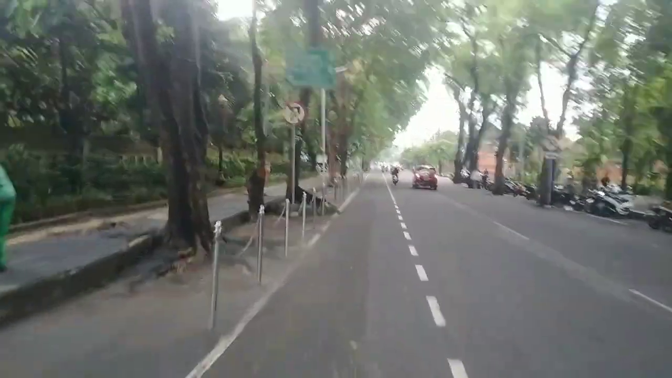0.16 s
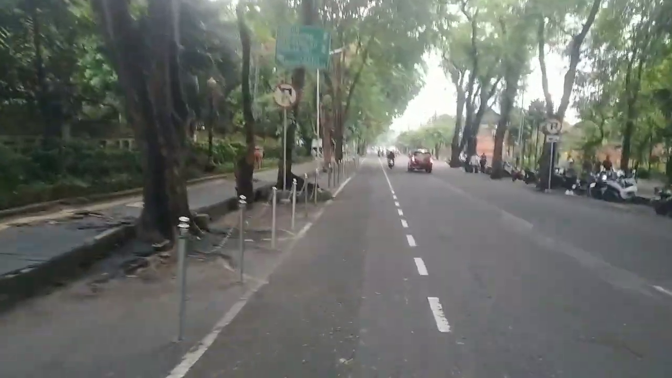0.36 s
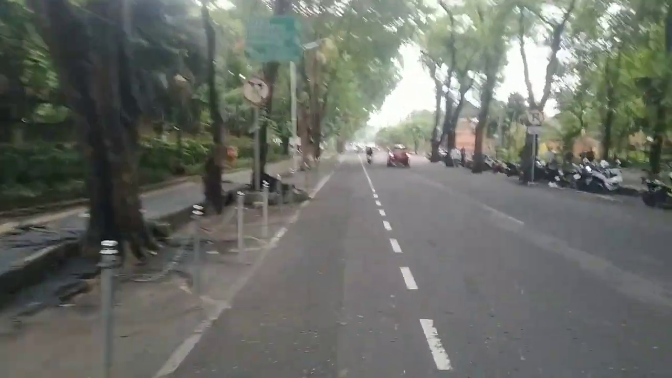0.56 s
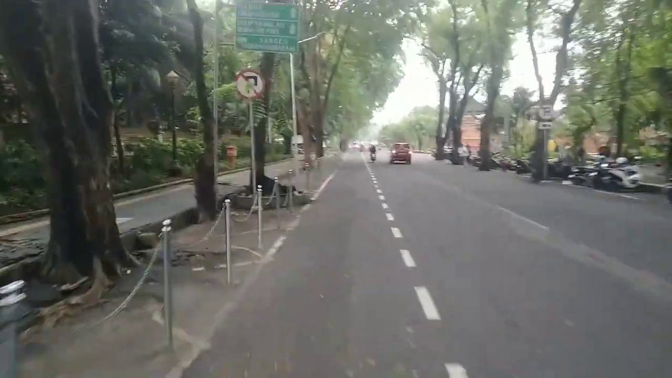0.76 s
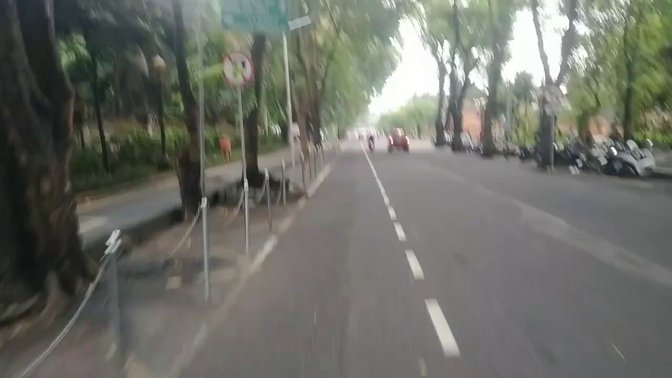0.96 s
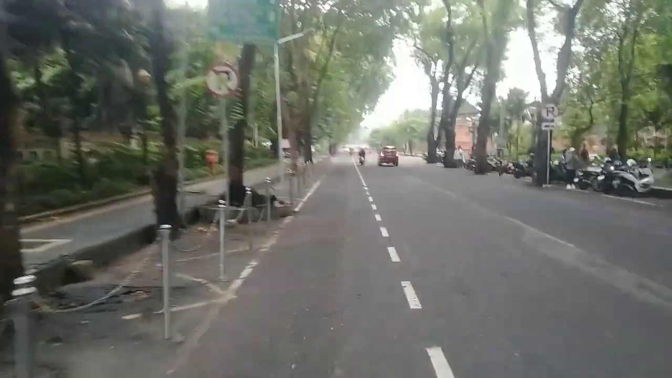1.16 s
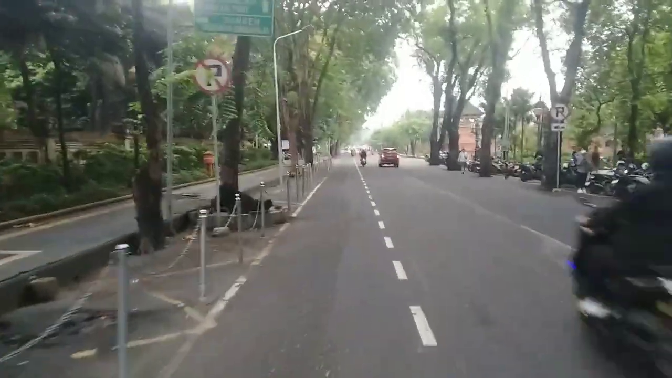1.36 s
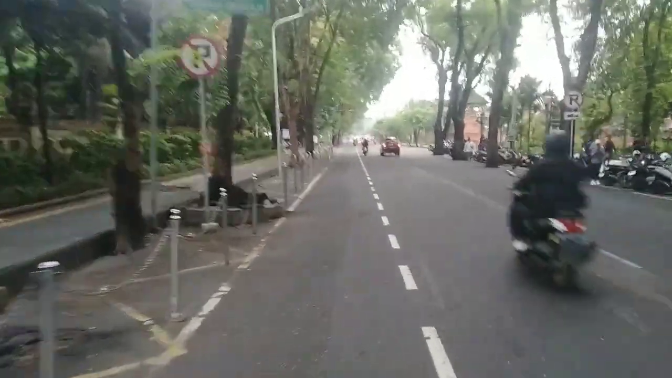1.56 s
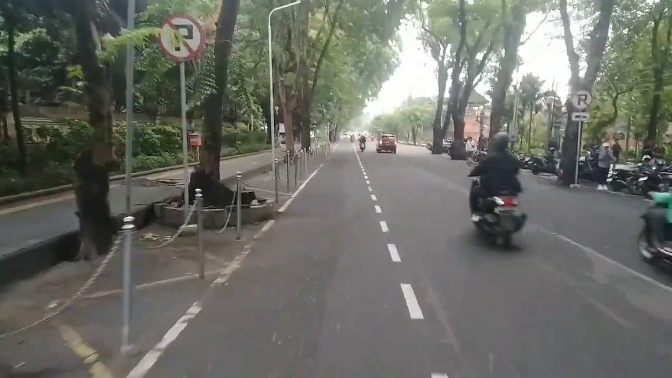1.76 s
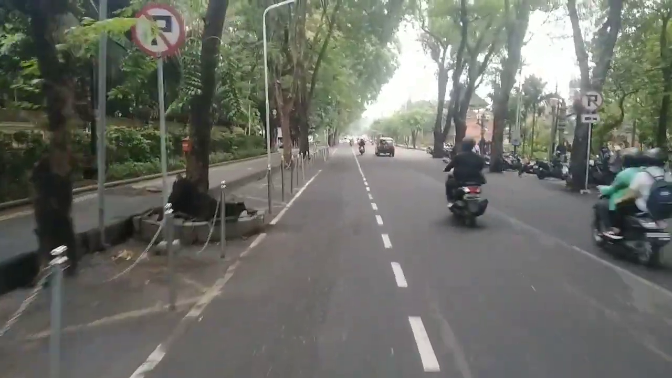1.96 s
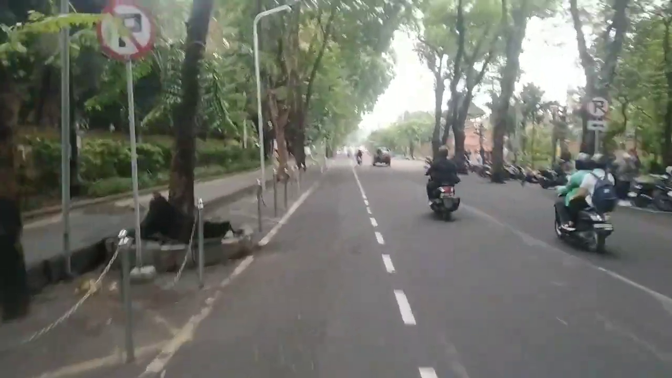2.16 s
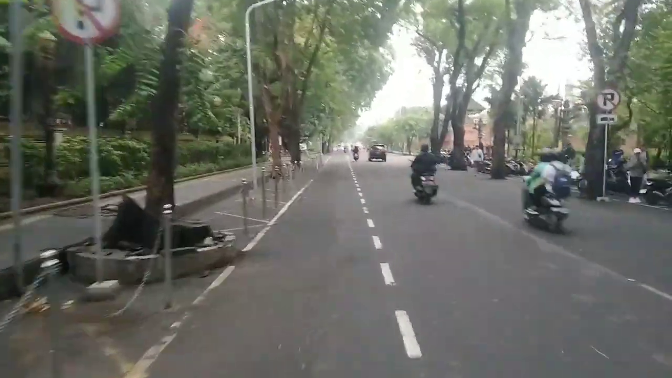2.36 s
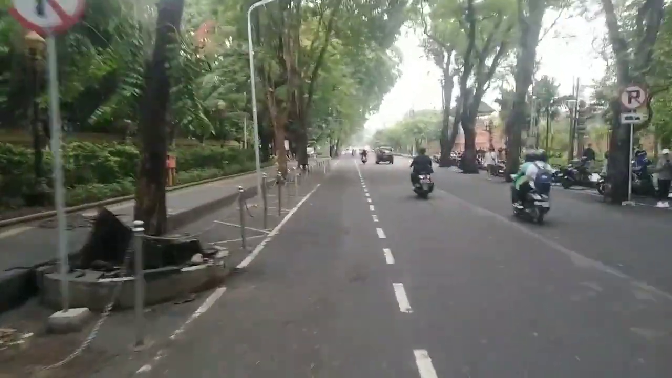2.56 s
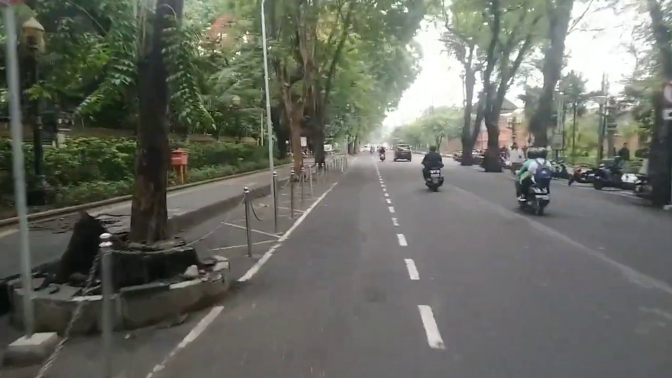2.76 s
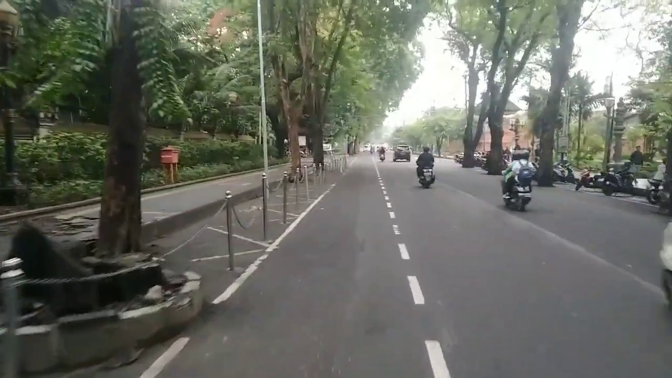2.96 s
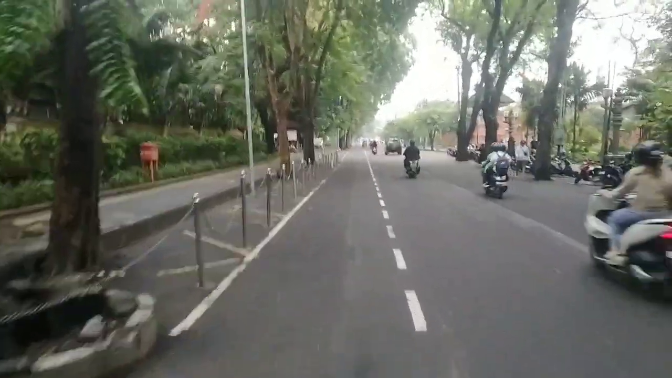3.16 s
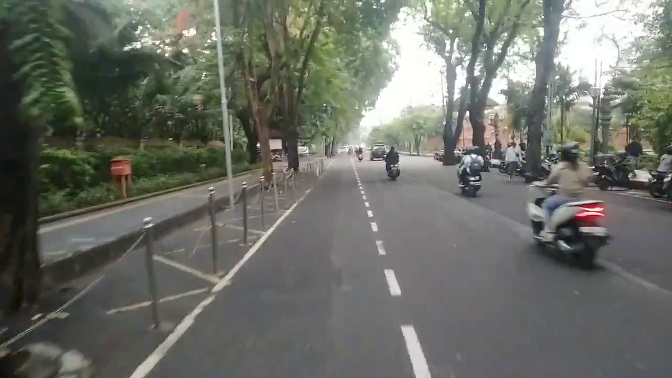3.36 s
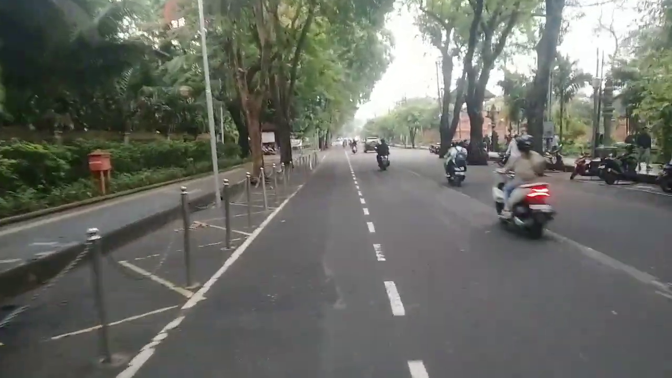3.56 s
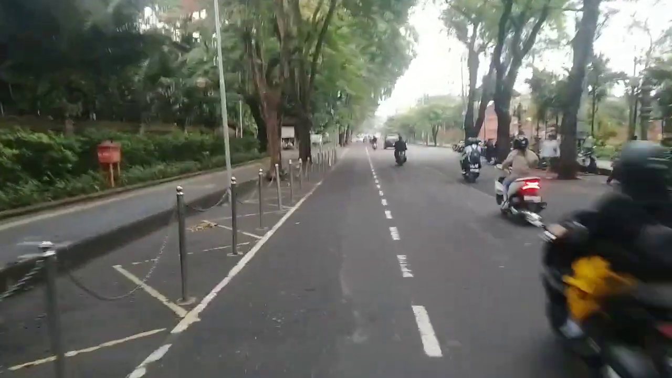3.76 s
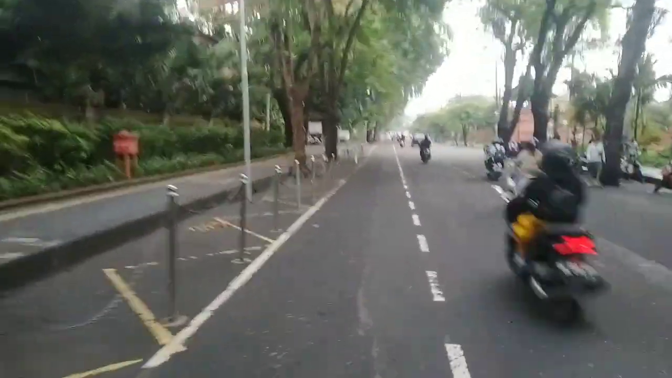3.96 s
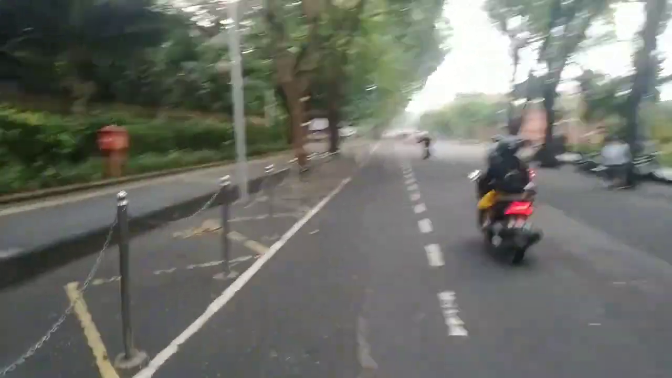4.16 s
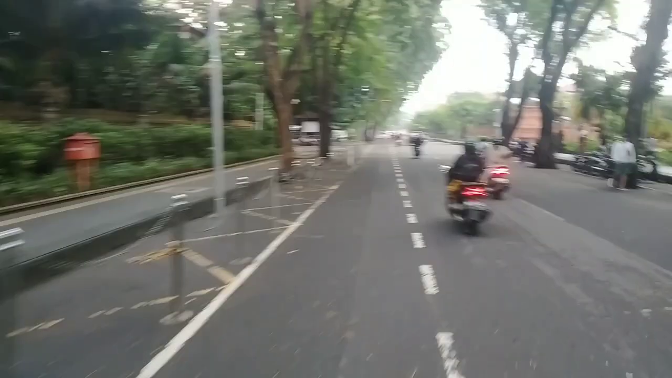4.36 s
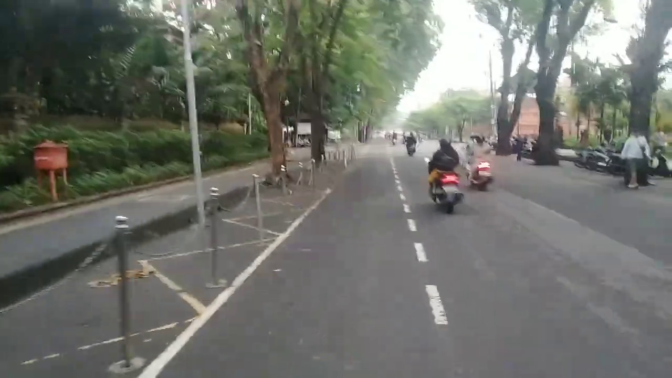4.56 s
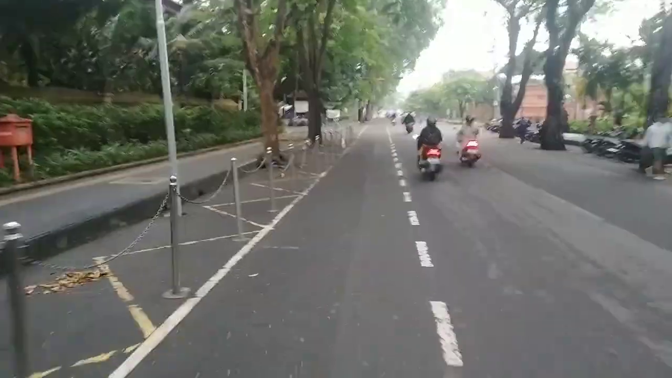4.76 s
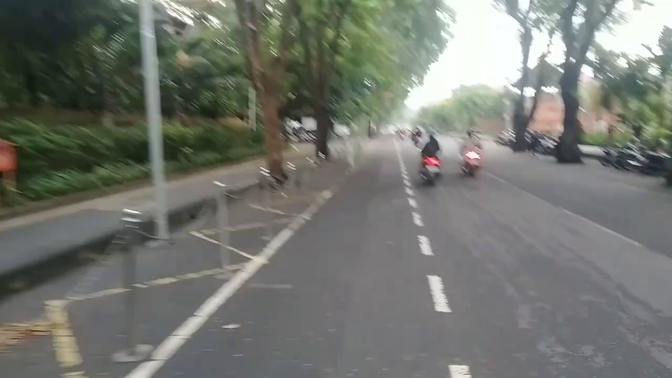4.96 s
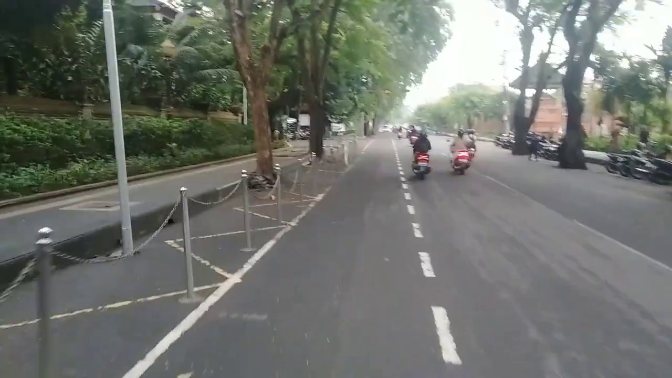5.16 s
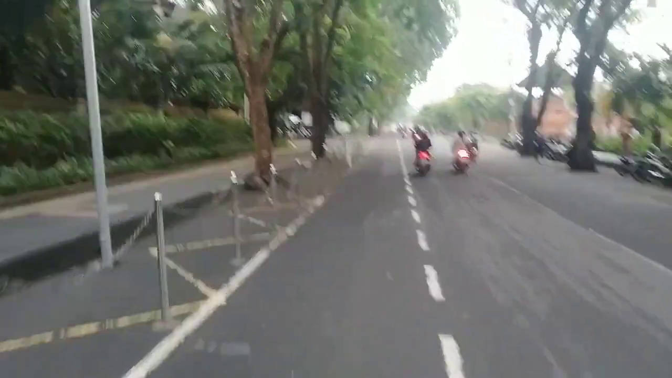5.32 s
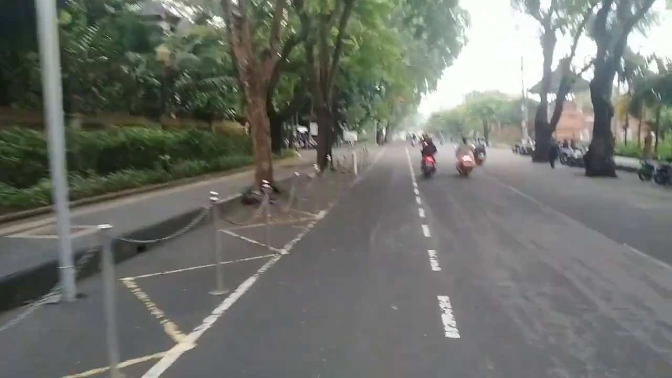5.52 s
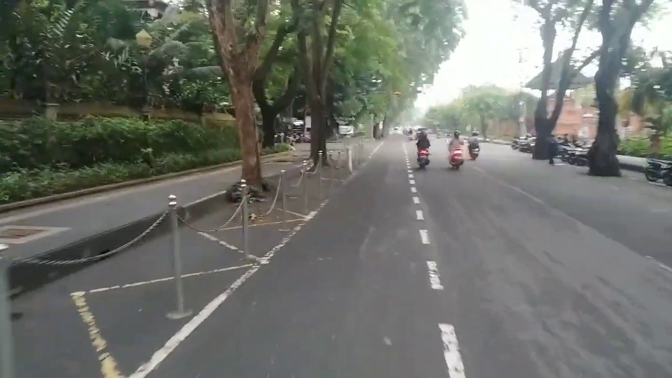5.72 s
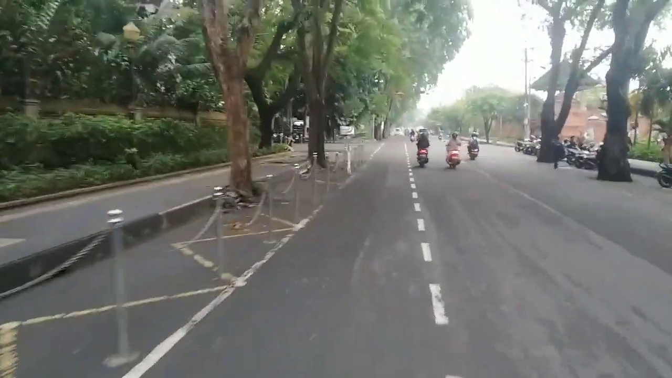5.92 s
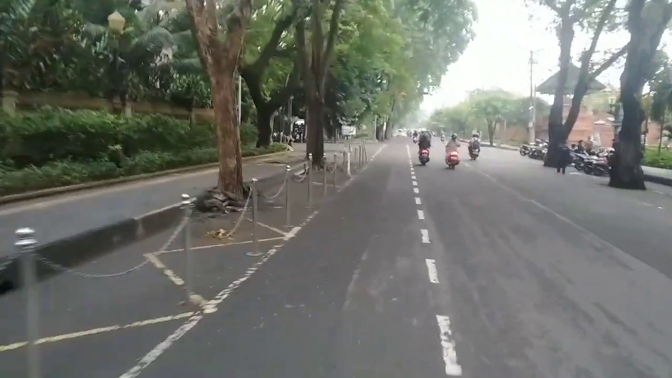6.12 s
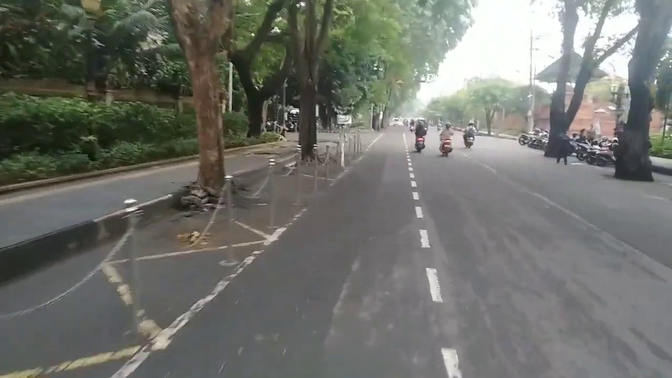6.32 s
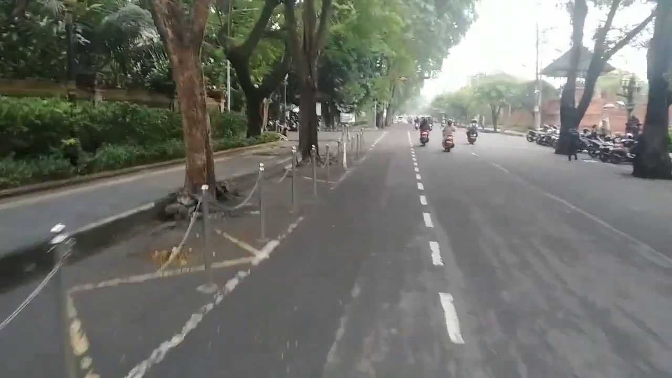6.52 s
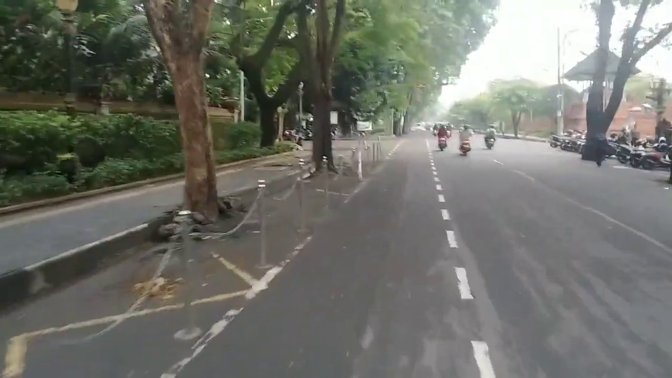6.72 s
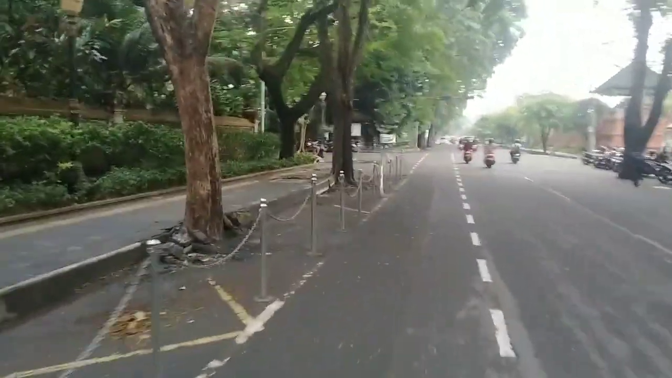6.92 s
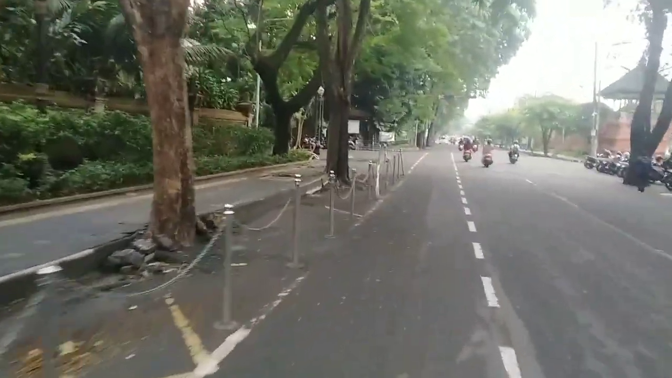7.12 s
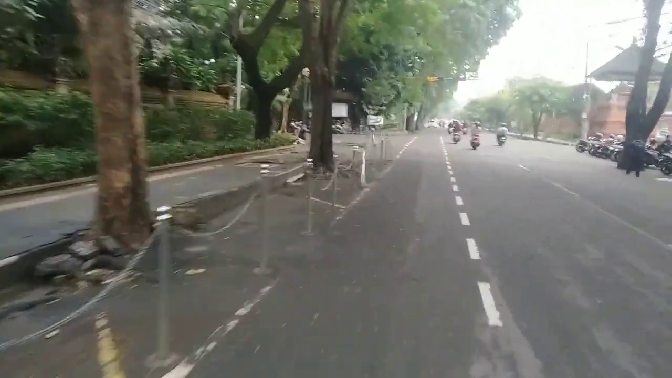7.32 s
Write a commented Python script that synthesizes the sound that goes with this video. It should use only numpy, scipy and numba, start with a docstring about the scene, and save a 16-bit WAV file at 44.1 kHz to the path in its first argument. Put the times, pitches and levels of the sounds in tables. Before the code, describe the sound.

On an open tree-lined street, four scooters overtake a handheld phone one by one within the first four seconds. Each brings a low puttering hum, belt-case rattle and tyre hiss, then a raspier exhaust as it rides off. Distant traffic murmurs behind, and wind thumps the microphone, mostly near the end.

```python
"""Four scooters overtake a phone held on a street, one after the other, and ride off ahead.
Each single cylinder hums as wavering overtones of its firing rate and thuds as uneven pulses ring its silencer;
pulsing noise makes the belt case rattle, the tailpipe rasp once it is past, and the tyre hiss.
Road roar and short moving resonances fill out the passes; gusts of low noise buffet the phone, most after 5.8 s.
Behind it all, far traffic is coloured noise that slowly swells and sinks."""
import sys
import numpy as np
from scipy import signal
from scipy.fft import rfft, irfft
from scipy.io import wavfile
from scipy.ndimage import uniform_filter1d
from numba import njit

SR = 44100
rng = np.random.default_rng(int(sys.argv[2]) if len(sys.argv) > 2 else 0)


def pcm_store(signal):
    """Save signal as 16-bit PCM."""
    levels = np.round(np.clip(np.atleast_2d(signal), -1, 1) * 32767)
    wavfile.write(sys.argv[1], SR, levels.astype(np.int16).T)


N = 330289
TIME = np.arange(N) / SR  # s
BINS = np.maximum(np.arange(N // 2 + 1) * SR / N, 1)  # Hz

# hiss of tyres on asphalt, near and far: frequency_hz, relative_level_db
TYRE_HISS = [(1500, -12), (3300, -5), (4300, 3.5), (5500, 0.9), (7000, 1), (7900, -2), (8300, -19.5),
             (9900, -19.5), (12000, -32), (14000, -38)]
# low roar of the road, near and far: frequency_hz, relative_level_db
ROAD_ROAR = [(20, -42), (48, -49), (65, -18.5), (90, -4.5), (135, 1.5), (190, 3.5), (290, -3.5),
             (360, -8.5), (480, -17), (800, -17), (2000, -65)]


def traffic():
    """The scooters together over the roar they raise in the street; the nearer ones weigh most in the side."""
    # one row a scooter, levels before losses along the street and shading: abreast_s, gap_m, speed_m_per_s,
    # exhaust_thud_db, belt_case_db, tailpipe_rasp_db, tyre_db, road_roar_db, dip_depth_0_to_1,
    # left_minus_right_abreast_db
    riders = [ (1.101, 2.37, 3.9, -21.5, -14, -12, -23, -19.5, 0.41, -2.5),
              (2.248, 3.24, 5.4, -20.5, -14.5, -18, -18.5, -35, 0.2, -4.5),
              (3.002, 2.6, 5.2, -24.5, -19, -16.5, -35, -21.5, 0.99, 0),
              (3.69, 1.97, 5.3, -22.5, -14.5, -19.5, -22.5, -38, 1, -1.5)]
    # one table a scooter, as heard at the phone: time_s, firing_rate_hz, exhaust_note_db, boom_hz
    throttles = [
        [(0, 47.53, -25.5, 180), (.25, 47.35, -27, 181), (.6, 46.82, -27, 180), (1, 45.95, -32, 185),
         (1.2, 44.7, -33.5, 201), (1.4, 44.26, -27.5, 186), (1.9, 43.79, -25.5, 180), (2.2, 42.82, -29, 185),
         (2.5, 42.47, -29, 180), (3.2, 42.06, -33, 200), (7.49, 41.95, -39, 200)],
        [(.6, 57.3, -35, 225), (1, 57.4, -23, 225), (1.5, 55.3, -33, 217), (2, 53.82, -29, 216),
         (2.3, 52.85, -30.5, 210), (2.55, 51.2, -31.5, 192), (2.8, 50.94, -36, 179), (7.49, 50.7, -46, 180)],
        [(2, 47, -38, 185.1), (2.6, 47.36, -33, 185), (3, 47.3, -35, 185.1), (3.3, 45.93, -32.5, 175),
         (3.7, 45.54, -36, 140), (4.3, 42.3, -33, 160), (4.7, 41.53, -30, 165), (5.4, 41.1, -28.5, 165),
         (5.8, 41.17, -40, 160), (7.49, 41, -39, 139.6)],
        [(3, 44.01, -37.5, 176), (3.6, 43.76, -36, 172), (3.85, 42.45, -30.5, 168), (4.15, 42.1, -26.5, 172),
         (4.45, 42, -26.5, 213.9), (4.75, 42.3, -27.5, 210), (5.1, 42.6, -36.5, 240), (5.45, 42.7, -28, 255),
         (6.1, 42.82, -26, 215), (6.8, 43, -22, 230), (7.4, 43.18, -25.5, 228.7)],
    ]
    # one row a scooter, coming up: relative level_db of the firing rate's multiples 2 to 10
    notes_coming = [(-3, -4.5, -0.5, -11, -14, -1.5, 3.5, 0, -4), (-15, -8, 1, -5, -4, 5.5, -9, -14, -15),
                    (2.5, 3.5, 0.5, 0, 2, 2.5, 6, -0.5, -8), (-6, -5.5, -5, -5, 7.5, -4, 7, -5, -10)]
    # the same once the silencer's mouth faces the phone: level_db of multiples 2 to 10
    notes_leaving = [(-14, -11, 0.5, 0, 2.5, -2, 4.5, -2.5, -15), (-15, -1, -3, -5, -4, 9.5, -7, -6, -13),
                     (-9, 1.5, 1, -7, -2, -4, -3, -3.5, -12), (-21, -4, 0, -1.5, -2, -15, -16, -9, -13.5)]
    # one table a scooter, silencer resonances: frequency_hz, width_hz, relative_level_db
    silencers = [
        [(105, 35, -10), (174, 68, -1.5), (215.6, 18, 2), (266.5, 12, -5), (359, 72, -6.5)],
        [(101, 7.2, -16), (221, 51, -7.5), (326, 57, -18), (363, 25, -3)],
        [(97, 5.3, -13), (126, 69, 9), (212, 28, 9), (253, 28, 1), (360, 55, -10)],
        [(127.3, 16, -8), (169.3, 27, -1), (206, 25, -2), (250, 71, -9), (361, 100, -11)],
    ]
    # one table a scooter, tailpipe resonances: frequency_hz, width_hz, relative_level_db
    tailpipes = [
        [(620, 320, 5.5), (883, 83, -4), (1426, 220, 3), (2980, 180, -1.5)],
        [(698.3, 340, -17), (1033, 400, -17), (1400, 310, 7), (2480, 450, 8.5)],
        [(610, 200, 2), (1010, 740, -9), (1453, 240, 9.5), (2650, 540, -0.5)],
        [(734, 130, 13), (850, 220, 9.5), (1400, 450, -0.5), (2880, 900, -0.5)],
    ]

    passes = map(scooter, riders, throttles, notes_coming, notes_leaving, silencers, tailpipes)
    sounds, roar_powers, pans_db, nearness = zip(*passes)
    roar = colour(noise(), ROAD_ROAR) * np.sqrt(sum(roar_powers)) * undb(walk(16))
    pan_db = np.average(pans_db, axis=0, weights=nearness)
    stereo = stereo_picture(sum(sounds) + roar + close_passes())
    return stereo * undb(np.array([pan_db, -pan_db]) / 2)


def scooter(rider, throttle, coming, leaving, silencer, tailpipe):
    """One pass, weakening with distance: its sound, road roar power, left-right lean in dB and nearness."""
    # rattle of the belt case: frequency_hz, relative_level_db
    belt_case = [(150, -49), (330, 4), (480, -0.5), (750, -0.5), (980, 1), (1250, -2.5), (1550, -5),
                 (1950, -8), (2500, -8), (3100, -5.5), (4200, -30), (8000, -57)]
    abreast_s, gap, speed, exhaust_db, case_db, rasp_db, tyre_db, roar_db, dip, side_db = rider
    distance, tail_on = bearing(abreast_s, gap, speed)
    side_on = gap / distance  # sine of the bearing
    exhaust_spread = np.array([[1], [.6]])  # gains of what left and right share and of what differs

    # the firing rate already carries the Doppler shift and the throttle
    firing_hz, note_db, boom_hz = curves(throttle)
    throttle_wander = .002  # share of the firing rate
    pulses, turns = cylinder(firing_hz * (1 + throttle_wander * walk(3)), jitter=0.0045)
    note = exhaust_note(turns, firing_hz, boom_hz, coming, leaving, tail_on)
    note = note * exhaust_spread * undb(note_db)

    # the silencer hangs on the scooter's far side, which hides part of the thud abreast
    silencer_shade, exhaust_db_per_m = 0.67, 0.7
    thud = resonate(pulses, silencer) * exhaust_spread
    thud = thud * undb(exhaust_db - exhaust_db_per_m * distance) * (1 - silencer_shade * side_on ** 6)

    # belt and valve gear chatter on every turn of the crank, twice a firing
    crank = 2 * turns % 1
    body_shade = 0.39  # share of the rattle that the scooter's body hides from behind
    rattle = colour(puffs(crank, length=0.56, steady=1.0), belt_case) * undb(case_db)
    rattle = rattle * (1 - body_shade * tail_on ** 4)
    # the walker's body hides one band of the rattle while a scooter is behind
    rear_shade, rear_shade_hz = 0.7, np.full(N, 2570.0)
    hidden = np.array([sweep(row, rear_shade_hz, 0.45) for row in rattle])
    rattle = rattle - rear_shade * (1 - tail_on) ** 5 * hidden

    # the sharp edge of each firing rings the tailpipe, along with the gas
    rasp_beam = 3.2  # how narrowly the rasp points backwards
    gas = unit(puffs(crank, length=.22, steady=.35))
    rasp = resonate(gas + 0.2 * unit(pulses), tailpipe) * undb(rasp_db) * tail_on ** rasp_beam
    scatter_db_per_m = 0.5844  # lost along the street
    machinery = sinking_dip(rattle + rasp, tail_on, dip)
    machinery = machinery * undb(0.81 * walk(12) - scatter_db_per_m * distance)

    # patches in the asphalt make the hiss flutter; it also pulses with the crank
    tyre_beam = 0.52  # how strongly the hiss favours the side
    flutter_db = .7 * walk(11) + .8 * walk(34)
    hiss = colour(puffs(crank, length=0.15, steady=2.1), TYRE_HISS)
    hiss = hiss * undb(tyre_db + flutter_db) * side_on ** tyre_beam

    behind_pan_db = 6  # a scooter still behind the phone favours the left
    pan_db = side_db * side_on + behind_pan_db * (1 - tail_on) ** 4
    sound = (note + thud + machinery + hiss) / distance
    roar_power = (undb(roar_db) / distance) ** 2
    return sound, roar_power, pan_db, 1 / distance ** 2


def bearing(abreast_s, gap, speed):
    """A straight pass: distance in m, and how far the tail faces the phone (0 coming up, 1 riding away)."""
    along = speed * (TIME - abreast_s)
    distance = np.hypot(along, gap)
    return distance, (1 + along / distance) / 2


def cylinder(hz, jitter):
    """Turns of the firing cycle, and one pulse a firing for how much stronger or weaker than usual it is."""
    turns = np.cumsum(hz) / SR + rng.random()
    at = np.flatnonzero(np.diff(np.floor(turns)))
    timing, strength = rng.standard_normal((2, len(at)))
    shift = (jitter * timing * SR / hz[at]).astype(int)  # jitter is a share of the firing cycle
    pulses = np.zeros(N)
    pulses[np.clip(at + shift, 0, N - 1)] = np.tanh(strength)
    return pulses, turns


def exhaust_note(turns, firing_hz, boom_hz, coming, leaving, tail_on):
    """The even part of the firings: wavering overtones, lifted at the boom, whose mix turns with the tail."""
    boom_db, boom_octaves = 7.5, 0.27  # lift and half width of the boom
    note_turn, waver_db = 0.066, 1.1  # how much of the tail's turn the change of mix takes; waver of each tone
    past = (1 + np.tanh((tail_on - .5) / note_turn / 2)) / 2
    out = 0
    for k, (coming_db, leaving_db) in enumerate(zip(coming, leaving), 2):
        boom = np.exp(-(np.log2(k * firing_hz / boom_hz) / boom_octaves) ** 2)
        mix_db = coming_db + (leaving_db - coming_db) * past
        db = mix_db + boom_db * boom + waver_db * walk(6)
        out = out + undb(db) * np.sin(2 * np.pi * (k * turns + rng.random((2, 1))))
    return np.sqrt(2) * out


def puffs(phase, length, steady):
    """Noise that flares at the start of each cycle and dies away over a length in cycles."""
    return noise() * (steady + np.exp(-phase / length))


def sinking_dip(sound, tail_on, depth):
    """A dip in the machinery noise sinks in pitch and deepens during the pass."""
    coming_hz, leaving_hz, width = 1700, 472, 0.44  # width over centre
    hz = leaving_hz * (coming_hz / leaving_hz) ** ((1 - tail_on) ** 1.3)
    removed = np.array([sweep(row, hz, width) for row in sound])
    return sound - np.clip(depth, 0, 1) * tail_on * removed


def close_passes():
    """The rush of close scooters, as noise bands that mostly fall in pitch, and the whines of the drives."""
    # rush resonances: centre_s, half_length_s, pitch_hz, fall_octaves_per_s, width_hz (one stage), level_db
    rushes = [(0.63, 0.28, 508, 0.11, 180, -32), (0.8, 0.17, 764, 0.82, 260, -30),
              (1.045, 0.11, 600, 1.05, 200, -24.2), (1.18, 0.088, 400, 0.6, 81, -25),
              (1.55, 0.24, 248, .2, 72, -31), (1.116, 0.11, 1315, 0.86, 180, -31.5),
              (2.75, 0.19, 1140, .2, 290, -34), (3.15, 0.23, 1046, 0.11, 250, -32.5),
              (3.55, 0.095, 524, 1.3, 120, -30.5), (3.474, 0.14, 1540, 0.45, 370, -28.5),
              (3.76, 0.13, 1190, 0.45, 310, -28.5), (3.69, 0.13, 351, .1, 40, -32),
              (3.2, 0.52, 139, 0.088, 38, -34.5)]
    # brief whines of belts, gears and tyres: centre_s, half_length_s, pitch_hz, fall_octaves_per_s,
    # width_hz (one stage), level_db
    whines = [(0.32, 0.14, 2050, 0.05, 100, -43.5), (0.71, 0.072, 2740, 0.79, 700, -30.5),
              (1.3, 0.11, 930, 0.1, 99.8, -27.5), (1.64, 0.22, 1585, -0.03, 165, -32.5),
              (2.263, 0.21, 6840, 0.15, 1290, -36.5), (2.48, 0.23, 2295, -0.09, 620, -30.5),
              (3, 0.36, 2470, -0.17, 420.1, -40), (4.009, 0.23, 1659, 0.16, 150, -31),
              (4.017, 0.19, 2570, 0.15, 349.5, -31.5), (4.7, 0.56, 1491, 0.026, 280, -47)]
    out = 0
    for at_s, half_s, hz, fall, width_hz, db in rushes + whines:
        out = out + undb(db) * glide(at_s, half_s, hz, fall, width_hz / hz)
    return out


def glide(at_s, half_s, hz, fall, relative_width):
    """A resonance that swells, fades and slides in pitch as its scooter goes by."""
    lapse = TIME - at_s
    centre = hz * 2 ** (-fall * np.clip(lapse, -2 * half_s, 2 * half_s))
    return band(centre, relative_width) * np.exp(-(lapse / half_s) ** 2 / 2)


def wind(fall_s, eddy_db):
    """Gusts tumble over the phone: low buffeting and an eddy pitch, part of the swirl differing left and right."""
    # gusts: start_s, length_s, rise_s, level_db, eddy_pitch_hz, unshared_swirl_db (relative), brightness_db
    gusts = [(0.02, 0.024, .016, -21, 147, 1, 0), (0.77, 0.13, .04, -28.5, 145, -5, -2),
             (1.15, 0.04, 0.014, -26.5, 100, -2, 0), (2.654, 0.15, .02, -37, 108, 3, -3),
             (3.056, 0.021, .016, -23, 155, 5, 3), (5.855, 0.038, .022, -22.5, 185.2, 3, 1.5),
             (5.916, 0.014, .012, -28, 148, 1, -2), (6.032, 0.052, .026, -22.5, 418, 1, 2.5),
             (6.1, 0.035, 0.015, -33, 201, 11, 4), (6.158, 0.05, 0.032, -29.5, 347.5, 5, 4),
             (6.214, 0.054, .016, -27.5, 100, 3.5, 6), (6.273, 0.036, .016, -24, 241, -2, 4),
             (6.319, 0.073, .016, -28, 204, 3, 1), (6.409, 0.081, .07, -32.5, 168.2, 7, -5),
             (6.589, 0.04, .015, -40, 540, 3, 2), (6.667, .018, 0.0071, -34.5, 240, 3, 0),
             (6.929, 0.024, 0.0088, -33, 190, 4, 5)]
    # buffeting of the phone: frequency_hz, relative_level_db
    buffet_spectrum = [(20, -50), (55, -23), (90, -5.5), (150, 3.5), (230, 2.5), (320, -5), (430, -6),
                       (620, -11.5), (900, -21.5), (1500, -26.5), (3000, -34.5), (8000, -50), (14000, -95)]
    bright_hz = 400  # brightness acts above this
    force, bright_force = 0, 0
    for start, length, rise_s, db, _, swirl_db, bright_db in gusts:
        rise = np.clip((TIME - start) / rise_s, 0, 1)
        fall = np.exp(-np.clip(TIME - start - length, 0, 1) / fall_s)
        gust = undb([[db], [db + swirl_db]]) * rise * fall
        force = force + gust
        bright_force = bright_force + gust * undb(bright_db)
    # the eddy pitch holds through each gust and glides on to the next
    eddy_points = [(s, hz) for start, length, _, _, hz, _, _ in gusts for s in (start, start + length)]
    eddy_hz = curves(eddy_points)[0]
    buffet = colour(noise(), buffet_spectrum)
    thump = irfft(rfft(buffet) / (1 + (BINS / bright_hz) ** 4), N)
    eddies = undb(eddy_db) * band(eddy_hz, 0.28)
    return (thump + eddies) * force + (buffet - thump) * bright_force


def town(roar_db, hiss_db, pan_db):
    """Far traffic further down the street: hum, road roar and a little tyre hiss, swelling slowly."""
    # far traffic: time_s, level_db, extra_hum_db
    town_level = [(0, -44.5, 0), (4.6, -37.5, 0.5), (5.25, -46, 4.5), (5.65, -39, -3), (6.75, -40, 0.5),
                  (7.15, -41.5, 2), (7.35, -43, -4), (7.49, -40, -9)]
    # its broad murmur: frequency_hz, relative_level_db
    town_spectrum = [(20, -34), (55, -15), (100, -37), (140, -10), (230, 7.5), (320, -12), (500, -9.5),
                     (620, -3.5), (1000, -13), (1400, -7), (2100, -15.5), (2700, -12), (4000, -19.5),
                     (9000, -75)]
    hum_top_hz = 350
    level_db, hum_db = curves(town_level)
    sound = colour(noise(), town_spectrum)
    sound = sound + colour(noise(), ROAD_ROAR) * undb(roar_db)
    sound = sound + colour(noise(), TYRE_HISS) * undb(hiss_db)
    hum = irfft(rfft(sound) / (1 + (BINS / hum_top_hz) ** 6), N)
    sound = sound + hum * (undb(hum_db) - 1)
    stereo = stereo_picture(sound * undb(level_db + walk(5.5)))
    return stereo * undb(np.array([[pan_db], [-pan_db]]) / 2)


def stereo_picture(sound):
    """The stereo picture: alike in the bass, opposed near 3.6 kHz, unrelated in the treble above."""
    # left against right: frequency_hz, likeness_0_to_1, left_leads_rad, left_minus_right_db
    left_right = [(60, 0.94, 0.11, 1.0), (420, 0.95, 0.32, -0.2), (650, 0.8, 0.94, 1.3),
                  (900, 0.81, 1.38, 5.6), (1250, 0.76, 0.66, 4.8), (1600, 0.68, 0.16, 2.4),
                  (2150, 0.46, 1.22, 2.6), (2600, 0.83, 1.78, 2.1), (3200, 0.68, 2.79, 0.4),
                  (3470, 0.999, 3.14, 0), (3740, 0.999, 3.14, 0), (4150, 0.09, 3.14, 0.3),
                  (6000, 0.03, 3.14, 1.6), (9000, 0.03, 3.14, 6.6)]
    likeness, lead, balance_db = over_bins(left_right)
    likeness = np.clip(likeness, 0, 1)
    shared, apart = rfft(sound) * np.sqrt([(1 + likeness) / 2, (1 - likeness) / 2])
    turn, lean = np.exp(.5j * lead), undb(balance_db / 2)
    left = (shared + apart) * turn * lean
    right = (shared - apart) / turn / lean
    return irfft(np.array([left, right]), N)


def undb(db):
    """Decibels to gain."""
    return 10 ** (np.asarray(db) / 20)


def unit(x):
    """Scale to rms 1."""
    return x / np.sqrt(np.mean(x ** 2))


def curves(rows):
    """The columns of a time table, one value a sample."""
    s, *columns = np.transpose(rows)
    return [np.interp(TIME, s, c) for c in columns]


def over_bins(rows):
    """The columns of a frequency table, one value a bin, joined along log frequency."""
    hz, *columns = np.transpose(rows)
    return [np.interp(np.log(BINS), np.log(hz), c) for c in columns]


def colour(x, spectrum):
    """Shape x by a spectrum of (Hz, dB) points, at rms 1."""
    return unit(irfft(rfft(x) * undb(over_bins(spectrum)[0]), N))


def resonate(x, modes):
    """Ring steep resonances (each applied twice) with x, at rms 1."""
    response = 0
    for hz, width, db in modes:
        response = response + undb(db) / (1 + 1j * (BINS - hz ** 2 / BINS) / width) ** 2
    return unit(irfft(rfft(x) * response, N))


def noise():
    """White noise in two rows: what left and right share, and what differs between them."""
    return rng.standard_normal((2, N))


def walk(rate):
    """Random levels held 1 / rate s and slewed twice; spread near 1."""
    k = int(SR / rate)
    steps = np.repeat(rng.standard_normal(N // k + 1), k)
    return 1.4 * uniform_filter1d(uniform_filter1d(steps, k), k)[:N]


def band(hz, relative_width):
    """Noise in a steep resonance (applied twice) whose centre moves, at rms 1."""
    return unit(np.array([sweep(sweep(row, hz, relative_width), hz, relative_width) for row in noise()]))


@njit
def sweep(x, hz, k):
    """State-variable band-pass with a moving centre; k is width over centre."""
    y, b, l = np.empty(len(x)), 0., 0.  # b and l: band-pass and low-pass states
    for i in range(len(x)):
        g = np.tan(np.pi * hz[i] / SR)
        v = (b + g * (x[i] - l)) / (1 + g * (g + k))
        b, l, y[i] = 2 * v - b, l + 2 * g * v, k * v
    return y


def scene():
    """Scooters, far traffic and wind at the phone; the gusts lean to the left."""
    gusts = stereo_picture(wind(fall_s=0.017, eddy_db=-4.5)) * undb([[1.4], [-1.4]])
    return traffic() + town(roar_db=5.0, hiss_db=-11.5, pan_db=0.5) + gusts


def record(dry):
    """The sound fades in and out over a few milliseconds; the phone cuts the top."""
    top_hz, fade_s = 14300, .004
    ends = np.clip(np.minimum(TIME, TIME[-1] - TIME) / fade_s, 0, 1)
    return signal.sosfilt(signal.ellip(10, .2, 80, top_hz, fs=SR, output="sos"), dry * ends)


dry = scene()
out = record(dry)
pcm_store(out)
```